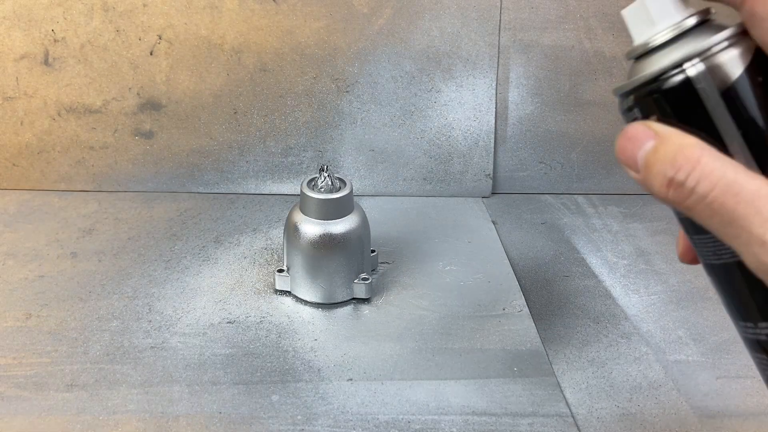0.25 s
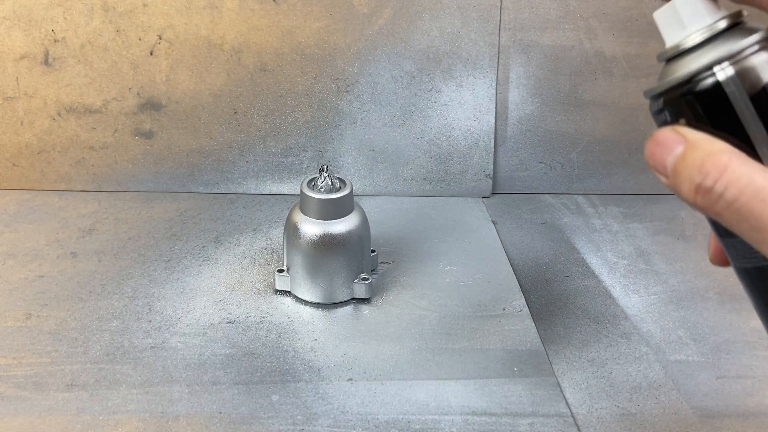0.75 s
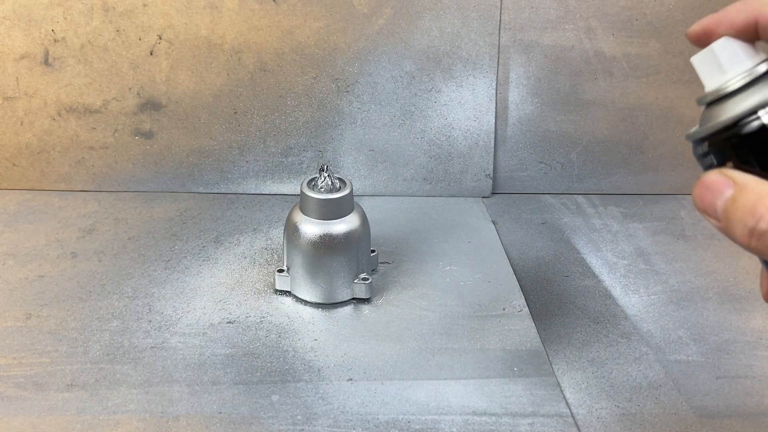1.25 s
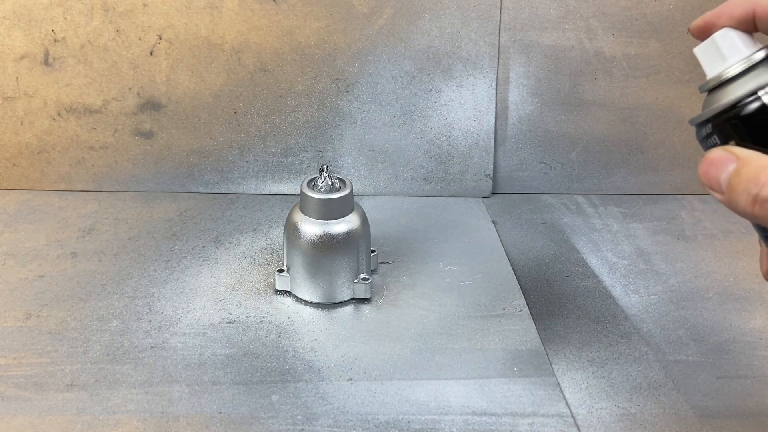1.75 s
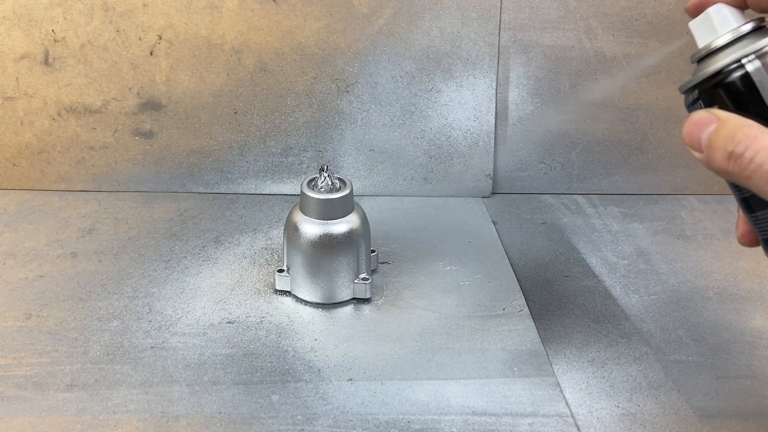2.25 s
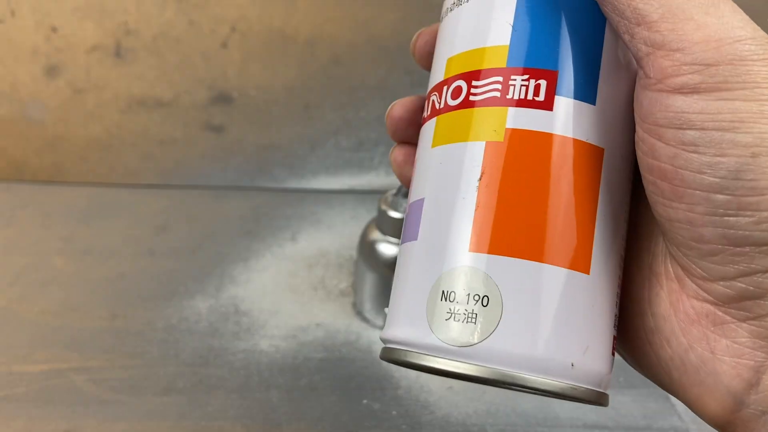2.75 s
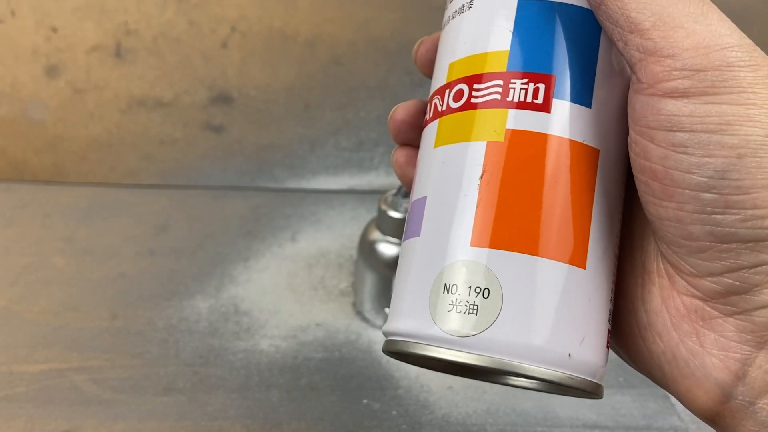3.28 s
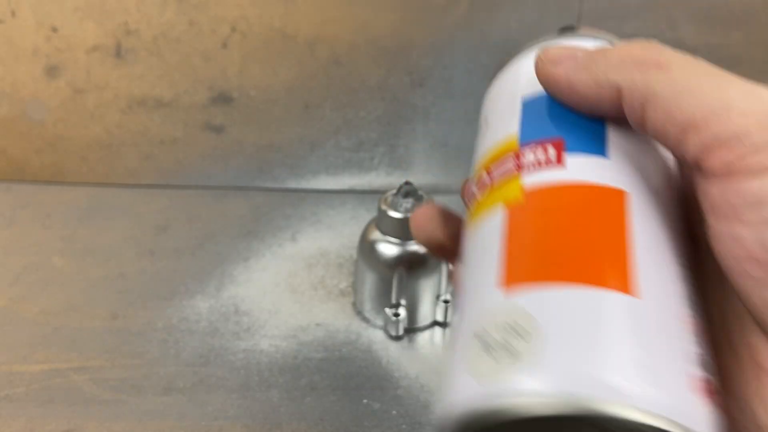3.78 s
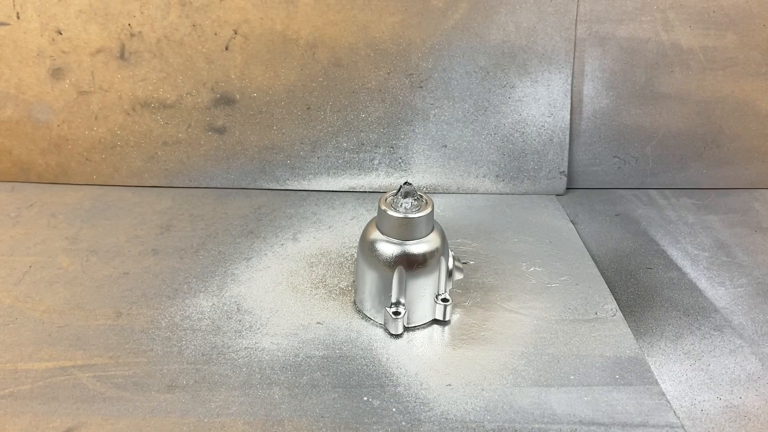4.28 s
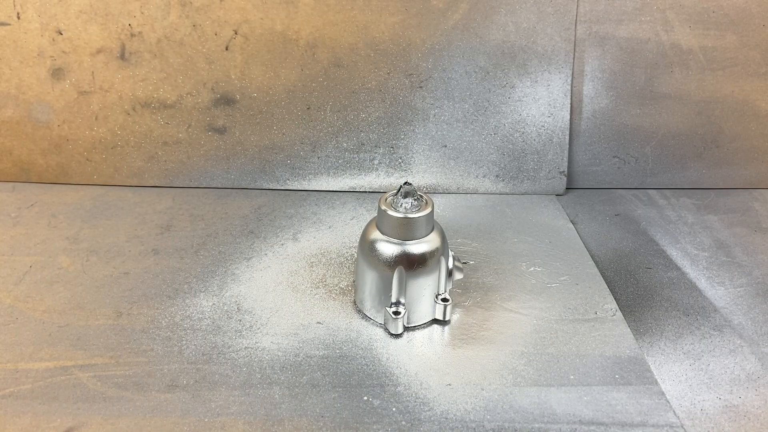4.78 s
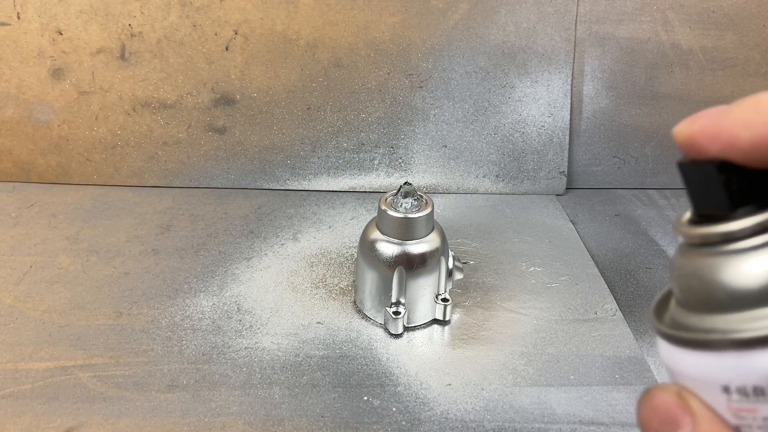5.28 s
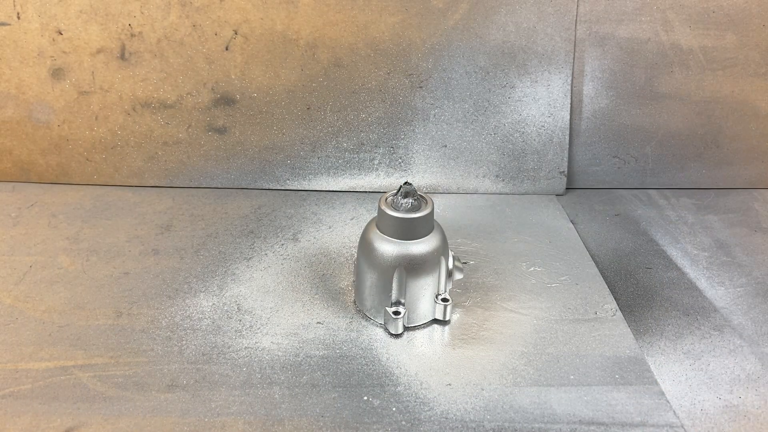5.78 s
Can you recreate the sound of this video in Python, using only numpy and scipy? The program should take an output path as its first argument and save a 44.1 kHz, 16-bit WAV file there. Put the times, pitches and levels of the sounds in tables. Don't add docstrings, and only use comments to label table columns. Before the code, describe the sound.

A quiet workshop with hard walls, miked closely in stereo. Brisk aerosol puffs hiss and shut off one after another. A hum with low rumble takes over, a hand rustles on the can, and the mixing ball rolls, pauses, then bangs rapidly against the tin, far louder than everything else and shifting toward the right. The rattle stops dead at a cut; a soft tick precedes a single longer, airier spray, then low hum remains.

```python
import sys
import numpy as np
from scipy import signal
from scipy.fft import rfft, irfft, next_fast_len
from scipy.io import wavfile
from scipy.ndimage import uniform_filter1d

SR = 44100
rng = np.random.default_rng(int(sys.argv[2]) if len(sys.argv) > 2 else 0)


def generate_wav(sig):
    pcm = np.round(np.clip(np.atleast_2d(sig).T, -1, 1) * 32767).astype(np.int16)
    wavfile.write(sys.argv[1], SR, pcm)


N = 265923


def gain_of(db):
    return 10 ** (np.asarray(db) / 20)


def evened(x):
    return x / np.sqrt(np.mean(x ** 2) + 1e-20)


def read(points, hz):
    f, value = np.transpose(points)
    return np.interp(np.log(hz + 1), np.log(f + 1), value, left=-90, right=-90)


def peak(s, db, rise, fall):
    late = np.arange(N) / SR - s
    return gain_of(db + np.minimum(rise * late, -fall * late))


def add(mix, s, sound):
    part = mix[:, round(s * SR):][:, :sound.shape[1]]
    part += sound[:, :part.shape[1]]


def resonate(x, hz, width):
    return signal.lfilter(*signal.iirpeak(hz, hz / width, SR), x)


def boomy(hz, width):
    return evened(resonate(resonate(rng.standard_normal(N), hz, width), hz, width))


def filtered(x, hz, kind, order=2):
    return signal.lfilter(*signal.butter(order, hz, kind, fs=SR), x)


def lead(x, turns):
    f, half = np.transpose(turns)
    size = next_fast_len(x.shape[1] + 2048)
    turn = np.exp(1j * np.pi * np.interp(np.fft.rfftfreq(size, 1 / SR), f, half))
    return np.array([x[0], irfft(rfft(x[1], size) * turn, size)[:x.shape[1]]])


def noise(colour, same, patchy_db, size=256):
    hop = size // 4
    hz = np.fft.rfftfreq(size, 1 / SR)
    a, b, c, d, patches = rng.standard_normal((N // hop + 5, len(hz), 5)).T
    patches = uniform_filter1d(patches, size=3, axis=0)
    patches = evened(uniform_filter1d(patches, size=24, axis=1))
    left = a + 1j * b
    z = np.array([left, same * left + np.sqrt(1 - same ** 2) * (c + 1j * d)])
    z *= gain_of(read(colour, hz)[:, None] + patchy_db * patches)
    return evened(signal.istft(z, nperseg=size, noverlap=size - hop)[1][:, :N])


# pitch_hz, t60_s
WALLS = [(200, 0.057), (1000, 0.23), (3000, 0.27), (8000, 0.21), (15000, 0.14)]


def walls(x, same):
    taps = rng.standard_normal((2, SR // 2))
    taps[1] = same * taps[0] + np.sqrt(1 - same ** 2) * taps[1]
    hz, t, z = signal.stft(taps, SR, nperseg=128)
    t60 = np.interp(hz, *np.transpose(WALLS))
    tail = signal.istft(z * gain_of(-60 * t / t60[:, None]), SR, nperseg=128)[1]
    tail[:, :150] = 0
    tail /= np.linalg.norm(tail[0])
    return signal.fftconvolve(x.mean(0)[None], tail, axes=1)[:, :N]


LEAK_DB = [-17.5, -16.5]
LEAK_S = [0.003, 0.0083]
PRESS_CURVE = [0.79, 1.98]
SAG_DB_PER_S = [146, 8]
SHUT_DB_PER_S = [748, 370]
HOLLOW_FADE = [0.98, 0.36]
HOLLOW_DB_PER_S = [29, 40]


def valve(presses, kind):
    seating_s, seat_db_per_s = 0.03, 700
    jet, hollow = np.zeros(N), np.zeros(N)
    for s, press, db, lift, hollow_db in presses:
        t = np.arange(N) / SR - s
        held = np.maximum(t - press, 0)
        unopened = np.clip(1 - t / press, 0, 1) ** PRESS_CURVE[kind]
        unopened += np.maximum(-t, 0) / LEAK_S[kind]
        under = LEAK_DB[kind] * unopened - SAG_DB_PER_S[kind] * held
        under -= SHUT_DB_PER_S[kind] * np.maximum(t - lift, 0)
        under -= seat_db_per_s * np.maximum(t - lift - seating_s, 0)
        under = np.maximum(under, -120)
        jet += gain_of(db + under)
        hollow += gain_of(db + hollow_db + (1 + HOLLOW_FADE[kind]) * under - HOLLOW_DB_PER_S[kind] * held)
    return 20 * np.log10(jet), 20 * np.log10(hollow / jet)


def spray(presses, colour, hollow_hz, width, flutter_db, kind):
    jet = noise(colour, same=0.81, patchy_db=2.0, size=512)
    jet_db, hollow_db = valve(presses, kind)
    low = signal.filtfilt(*signal.butter(2, 4000, fs=SR), jet)
    jet += low * (gain_of(0.86 * np.minimum(jet_db + 36.5, 0)) - 1)
    hollow = boomy(hollow_hz, width)
    flutter = evened(uniform_filter1d(rng.standard_normal(N), size=150))
    level = gain_of(jet_db + 1.5 + flutter_db * flutter)
    return level * (jet + gain_of(hollow_db - 7.0) * hollow)


# start_s, press_s, level_db, lift_after_s, hollow_relative_db
PUFFS = [
    (-.07, .03, -31, 0.098, -3.5),
    (.469, .034, -27, 0.1, -10),
    (.938, 0.035, -26.5, .11, -5),
    (1.401, 0.036, -27, 0.093, -1.5),
    (1.862, 0.032, -29.5, .095, -2),
    (2.237, 0.035, -28, 0.11, 0),
]
# pitch_hz, level_db
PUFF_JET = [(150, -3), (600, -17), (1100, -10), (2500, -7), (4000, -8), (6000, -6.5), (8500, 3),
            (12000, -2.5), (15500, 0), (16000, -32.5)]


def puffs():
    return spray(PUFFS, PUFF_JET, 1858, 500, flutter_db=1.5, kind=0)


# start_s, hum_db, hum_drift_db_per_s, rumble_db, murmur_db
TAKES = [
    (0, -140, 0, -56.5, -60),
    (.253, -140, -2, -73.5, -84.5),
    (2.722, -49, 2, -57.5, -67.5),
    (4.29, -53, -6, -53, -56.5),
    (5.03, -52.5, -1, -66, -77),
]
HUM_HZ = [48.66, 49.4, 48.6, 49.5, 50.2]
# peak_s, rumble_db, murmur_relative_db
JOLTS = [(.01, -59, 7), (.13, -67, 9), (.28, -64, -5.5), (.51, -55, 3.5), (.98, -56.5, 7), (1.46, -59, 5.5),
         (1.93, -59.5, 1.5), (2.28, -61.5, 9), (2.79, -42.5, -13.5), (3.05, -61, -0.5), (3.329, -48, -13),
         (4.171, -53.5, 8.5), (4.24, -41.5, -1.5), (5.38, -52.5, 6), (5.5, -70.5, 12.5)]
# pitch_hz, level_db
RUMBLE = [(15, -39), (25, -11.5), (38, -15.5), (54, 4), (91, -4), (135, -5), (167, -17.5), (200, -13),
          (260, -40), (440, -120)]
# pitch_hz, level_db
MACHINES = [(88, -34), (150, -9), (177, -17), (267, -8.5), (375, -14), (578, -30.5), (681, -34.5),
            (1150, -39), (1500, -51), (1950, -82), (3300, -120)]
# pitch_hz, level_db
HISS = [(400, 0), (700, 4), (1000, -5), (1400, -5.5), (2200, -10.5), (6500, -14.5), (9500, -14.5),
        (12500, -17), (13800, -22.5), (14500, -48)]


def jolted(base_db, share, fall_db_per_s):
    jolts = sum(peak(s, db + share * relative_db, 350, fall_db_per_s) for s, db, relative_db in JOLTS)
    return uniform_filter1d(gain_of(base_db) + jolts, size=600)


def workshop():
    t = np.arange(N) / SR
    take = np.searchsorted(np.array(TAKES)[1:, 0], t)
    s, hum_db, drift, rumble_db, murmur_db = np.array(TAKES)[take].T
    rumble = jolted(rumble_db, 0, fall_db_per_s=85)
    machines = jolted(murmur_db, 1, fall_db_per_s=115)
    motor = uniform_filter1d(gain_of(hum_db + drift * (t - s)), size=600)
    boom = boomy(133, 37) * motor / motor.max()
    low = rumble * (noise(RUMBLE, same=0.88, patchy_db=4.5, size=4096) + 0.47 * boom)
    murmur = machines * noise(MACHINES, same=0.63, patchy_db=2.8, size=1024)
    hiss = gain_of(-81.5) * noise(HISS, same=0.4, patchy_db=0.6)
    hum = np.sqrt(2) * motor * np.sin(2 * np.pi * np.cumsum(np.array(HUM_HZ)[take]) / SR)
    return hum + low + murmur + hiss


# start_s, peak_db, ring_hz, upper_ring_relative_db, ringing_share
TICKS = [
    (0.2533, -50.5, 2800, -15, 0.2),
    (0.2757, -45, 3020, -8, 0.4),
    (0.3242, -61, 2890, -17.5, 0.9),
    (0.3906, -74.5, 2960, 9, 0.9),
    (0.4226, -41.5, 2860, -10.5, 0.7),
    (3.6391, -42.5, 2410, -21.5, 0.3),
    (5.2961, -55, 2350, -8.5, 0.4),
]
# peak_s, level_db, rise_db_per_s, fall_db_per_s
RUSTLE = [
    (.272, -63, 5000, 280),
    (3.642, -62, 3000, 150),
    (3.695, -60, 300, 350),
    (3.787, -58, 500, 5000),
    (3.95, -55, 2000, 75),
    (4.045, -46, 600, 5000),
]
# pitch_hz, level_db
RUSTLE_COLOUR = [(1000, -20.5), (2000, -15), (3200, 0), (4200, -10.5), (7000, -2), (11000, -1), (15500, 0),
                 (16000, -56)]


def ticks():
    out, t = np.zeros((2, N)), np.arange(1500) / SR
    for (s, db, hz, upper_db, ring), puff in zip(TICKS, rng.standard_normal((len(TICKS), len(t)))):
        rings = np.sin(2 * np.pi * hz * t) + gain_of(upper_db) * np.sin(2 * np.pi * 5000 * t)
        tick = ring * gain_of(-60 * t / 0.009) * rings * np.minimum(t / 0.0006, 1)
        tick += 0.34 * (1 - ring) * puff * gain_of(-60 * t / 0.012)
        add(out, s, gain_of(db) * np.array([tick, tick]))
    level = sum(peak(*row) for row in RUSTLE)
    level += peak(0, -51, 1, 220)
    return out + level * noise(RUSTLE_COLOUR, same=0.6, patchy_db=2.5)


# start_s, peak_db, patch_hz
ROLLING = [(3.789, -26, 2336), (3.8058, -20, 2415), (3.818, -14.5, 2202), (3.8402, -17.5, 1994),
           (3.8552, -10.5, 3060), (3.8634, -11, 2993), (3.8791, -15.5, 3080), (3.885, -10, 3077),
           (3.8934, -15, 2110), (3.9018, -21.5, 1950), (3.9129, -19.5, 1950), (3.9268, -23, 2950),
           (4.0134, -42.5, 3066), (4.0472, -13.5, 3454), (4.0535, -19, 6440), (4.0847, -22.5, 6485),
           (4.0935, -28.5, 2650), (4.1046, -35, 3340)]
# start_s, peak_db, patch_hz, squareness_extra_crack_db
LANDINGS = [(4.1694, -4.5, 1746, 9), (4.179, -7, 4294, 12.5), (4.1983, -18, 4400, 0.5),
            (4.272, -3.5, 4994, 3.5), (4.2869, -6.5, 3300, 8), (4.3759, -8.5, 1987, 0.5),
            (4.3834, -6, 4102, -7.5), (4.4561, -3, 3562, 7.5), (4.4681, -7.5, 3354, 9),
            (4.4843, -7, 3954, 0), (4.5053, -7.5, 3678, 1.5), (4.5137, -8, 3620, 11),
            (4.56, -6, 2783, -7.5), (4.6522, -7, 3104, -5.5), (4.6588, -7.5, 1684, 9.5),
            (4.6739, -5.5, 3386, 11.5), (4.7458, -12.5, 2623, -5.5), (4.8062, -9, 1400, 1),
            (4.8213, -6.5, 4620, -4), (4.83, -6.5, 4955, 17), (4.838, -12, 3620, 3),
            (4.8439, -5.5, 4015, -1.5), (4.8589, -12, 3388, 11), (4.872, -12, 3045, 15),
            (4.9094, -8.5, 2220, -6.5), (4.9366, -12.5, 2654, -1.5), (4.9854, -6, 2983, 9),
            (4.9916, -2.5, 4440, 5.5)]
# start_s, peak_db
BOUNCES = [(4.2255, -18.5), (4.3052, -18.5), (4.3324, -9.5), (4.3997, -28), (4.4285, -29), (4.5232, -16.5),
           (4.5713, -11.5), (4.6019, -26), (4.6415, -15), (4.6925, -11), (4.73, -17), (4.7561, -13),
           (4.7672, -21), (4.8104, -22), (4.8814, -17.5), (4.9044, -19.5)]
# crack_above_6khz_relative_db, thud_below_1500hz_relative_db, scrape_t60_s
CONTACT = [
    (-8.5, -20.5, 0.043),
    (-22, -13.5, 0.068),
    (-16, -8, 0.014),
]
MOVED_S = 4.14


def contacts_in_time():
    rolling, landing, bounce = CONTACT
    side_wall_hz, dulling_db_per_s, thud_db_per_octave = 1757, -1.5, -9
    rows = [(*r, 0, *rolling) for r in ROLLING]
    rows += [(*r, *landing) for r in LANDINGS]
    rows += [(*r, side_wall_hz, 0, *bounce) for r in BOUNCES]
    return [(s, db, hz, crack_db + extra_db + dulling_db_per_s * max(s - MOVED_S, 0),
             thud_db + thud_db_per_octave * np.log2(hz / 2500), scrape)
            for s, db, hz, extra_db, crack_db, thud_db, scrape in sorted(rows)]


# pitch_hz, level_db, time_to_fall_100_db_s
TIN = [(1820, -10.5, 0.0088), (3050, -12, 0.17), (2923, -11, 0.03), (3570, -25.5, 0.054), (4130, 2, 0.14),
       (4270, -3, 0.17), (5496, -31, 0.093), (6428, -26.5, 0.12), (6870, -1, 0.11), (6800, 6.5, 0.055)]


def strike(row, luck):
    s, db, hz, crack_db, thud_db, scrape = row
    t = np.arange(luck.shape[1]) / SR
    shimmer = 0.55 * gain_of(-60 * t / np.clip(scrape, 0.01, 0.12))
    scuff = (luck + 0.5 * luck[::-1]) * (gain_of(-60 * t / 0.006) + shimmer)
    scuff[:, 2:4] += [[7, -6]]
    wall = 0
    for (f, mode_db, t60), g in zip(TIN, luck[0]):
        wall = wall + gain_of(mode_db + 4.0 * g - 100 * t / t60) * np.sin(2 * np.pi * f * (1 + 0.04 * g) * t)
    body = filtered(scuff, [1500, 6000], "bandpass")
    crack = filtered(scuff * gain_of(-60 * t / 0.1), [6000, 13500], "bandpass")
    thud_hz = 1100 + 200 * np.tanh(luck[1, 0])
    thud = gain_of(-60 * t / 0.013) * np.sin(2 * np.pi * thud_hz * t) * np.minimum(t / 0.0006, 1)
    patch = gain_of(-60 * t / 0.011) * np.sin(2 * np.pi * hz * t + 0.8 * luck[:, 8:9])
    sound = 0.55 * patch + 0.8 * body / abs(body).max() + 0.1 * wall / abs(wall).max()
    sound = sound + gain_of(crack_db + 11.5) * crack / abs(crack).max()
    sound = sound + gain_of(thud_db + np.array([[-4.0], [1.5]])) * thud
    contacts = np.zeros(128)
    contacts[[0, 25]] = 0.3, 1
    chatter = 45 + (35 * abs(luck[1, 1:4])).astype(int)
    contacts[np.clip(chatter, 0, 127)] = 0.4 * luck[1, 4:7]
    sound = filtered(signal.convolve(sound, contacts[None]), 550, "highpass")
    return s, gain_of(db + 1.85) * sound / abs(sound).max()


# peak_s, level_db
SLOSH = [(3.79, -45), (3.82, -42), (3.86, -38), (3.89, -41.5), (3.92, -53.5), (4.046, -29.5), (4.173, -29),
         (4.274, -27.5), (4.38, -39.5), (4.456, -32.5), (4.51, -42.5), (4.56, -42), (4.646, -36.5),
         (4.748, -40), (4.812, -29.5), (4.912, -45)]
# pitch_hz, level_db
SLOSH_COLOUR = [(300, -27), (600, -6), (1500, -2.5), (3000, -4.5), (5000, -4), (7000, -7), (11000, -10.5),
                (15500, -15), (16000, -38)]
# peak_s, level_db, rise_db_per_s, fall_db_per_s
ROLL = [
    (3.846, -30, 600, 150),
    (3.89, -36, 400, 100),
]
# pitch_hz, lead_half_turns
CAN_RIGHT = [(0, 0), (400, .15), (1000, .95), (1500, 1.1), (3000, 2), (3700, 2.25), (4600, 2), (22050, 2)]


def shaken_can():
    roll_end_s, cut_s = 3.935, 5.017
    can, t = np.zeros((2, N)), np.arange(N) / SR
    rows = contacts_in_time()
    for row, luck in zip(rows, rng.standard_normal((len(rows), 2, 3500))):
        add(can, *strike(row, luck))
    grit = gain_of(3.6 * evened(uniform_filter1d(rng.standard_normal(N), size=80)))
    slide = sum(peak(*row, 2500, 170) for row in SLOSH)
    slide *= np.clip(abs(t - roll_end_s - 0.06) / 0.01 - 4.5, 0.25, 1)
    can += slide * noise(SLOSH_COLOUR, same=0.6, patchy_db=3.0) * evened(grit)
    roll = sum(peak(*row) for row in ROLL) * np.minimum(gain_of(900 * (roll_end_s - t)), 1)
    can += gain_of(-8.0) * roll * boomy(1950, 170)
    facing_away = filtered(can, 5000, "lowpass", order=1)
    direct = can * (t < MOVED_S) + lead(can * (t >= MOVED_S), CAN_RIGHT)
    can = direct + gain_of(-12.0) * walls(facing_away, same=0.49)
    return can * np.clip((cut_s - t) / 0.006 + 0.5, 0, 1) ** 2


# start_s, press_s, level_db, lift_after_s, hollow_relative_db
STROKE = [
    (5.31, 0.069, -33.5, 0.26, -1.9),
]
# pitch_hz, level_db
STROKE_JET = [(150, -9), (700, -10), (1500, -7.5), (3000, -8), (3550, -18), (4100, -6.5), (5500, -5.5),
              (6300, -10), (7000, -4), (9500, 0), (12000, -0.5), (15500, -1), (16000, -22)]


def stroke():
    return spray(STROKE, STROKE_JET, 2526, 734, flutter_db=1.0, kind=1)


def scene():
    near = puffs() + stroke() + ticks()
    return near + gain_of(-10.0) * walls(near, same=0.11) + shaken_can() + workshop()


def band_limit(x):
    return signal.sosfilt(signal.butter(12, 16990, fs=SR, output="sos"), x)


# pitch_hz, lead_half_turns
PORTS = [(0, 0), (7000, 0), (8650, 1), (9250, 1), (10600, 2), (11500, 2), (12950, 3), (13700, 3),
         (15000, 4), (22050, 4)]


def record(dry):
    shared_hz, edge_hz = 6300, 15900
    dry = np.pad(dry, ((0, 0), (0, 2048)), "reflect", reflect_type="odd")
    side = (dry[0] - dry[1]) / 2
    loudness = np.sqrt(abs(uniform_filter1d(dry.mean(0) ** 2, size=400)))
    kept = np.clip(0.03 + 40 * loudness ** 1.7, 0, 0.9)
    low_side = signal.oaconvolve(side, signal.firwin(255, shared_hz, fs=SR), "same")
    side = low_side * (1 - kept) + kept * side
    dry = dry.mean(0) + np.array([side, -side])
    dry = signal.oaconvolve(dry, signal.firwin(255, edge_hz, fs=SR)[None], "same") + 0.14 * dry
    dry = 1.5 * np.tanh(lead(dry, PORTS)[:, :N] / 1.5)
    dry *= np.minimum(np.arange(N)[::-1] / 300, 1)
    return band_limit(dry)


dry = scene()
out = record(dry)
generate_wav(out)
```